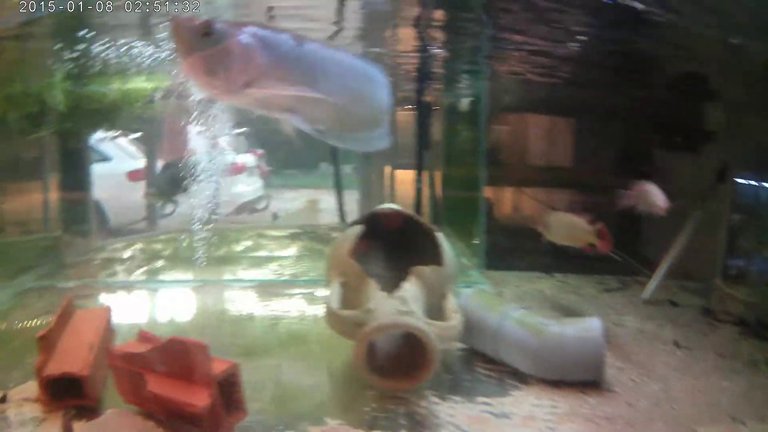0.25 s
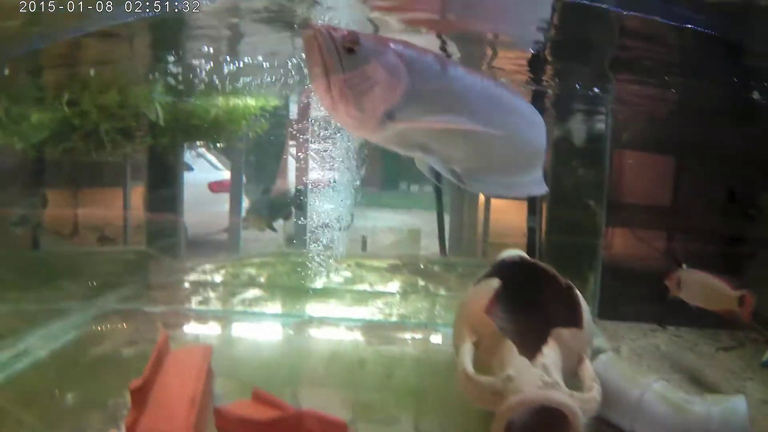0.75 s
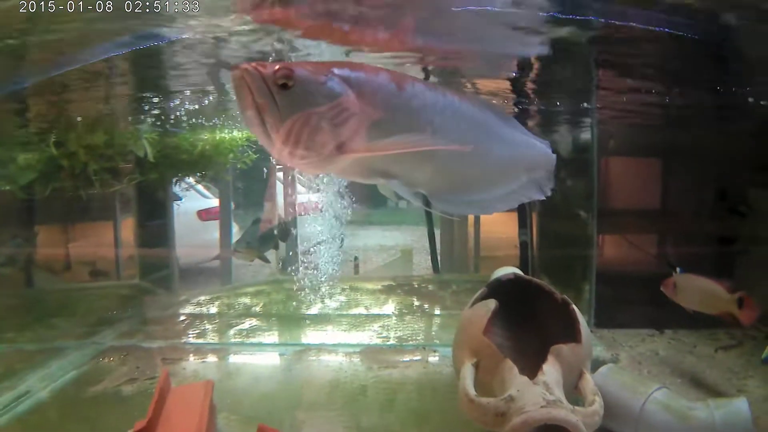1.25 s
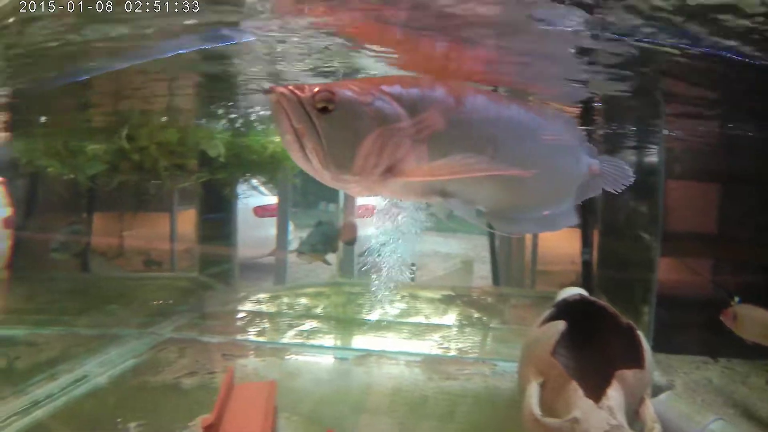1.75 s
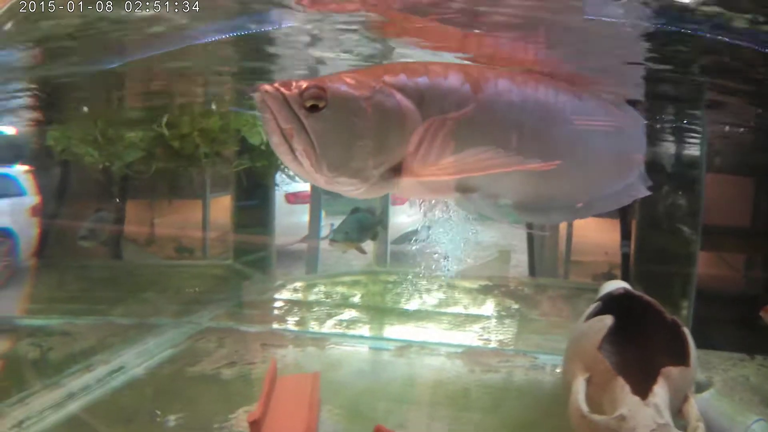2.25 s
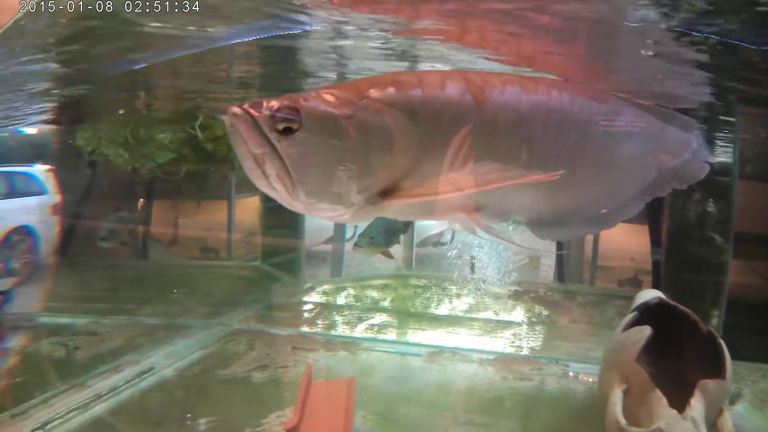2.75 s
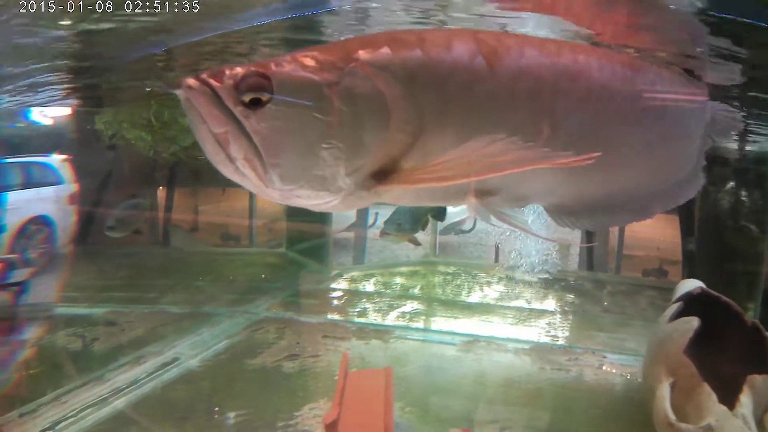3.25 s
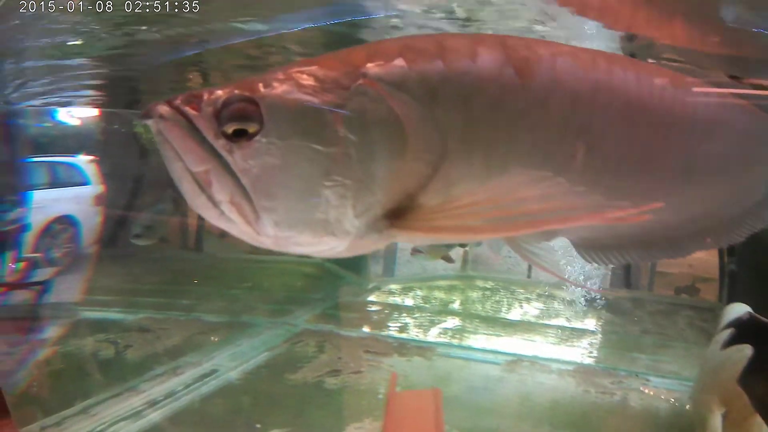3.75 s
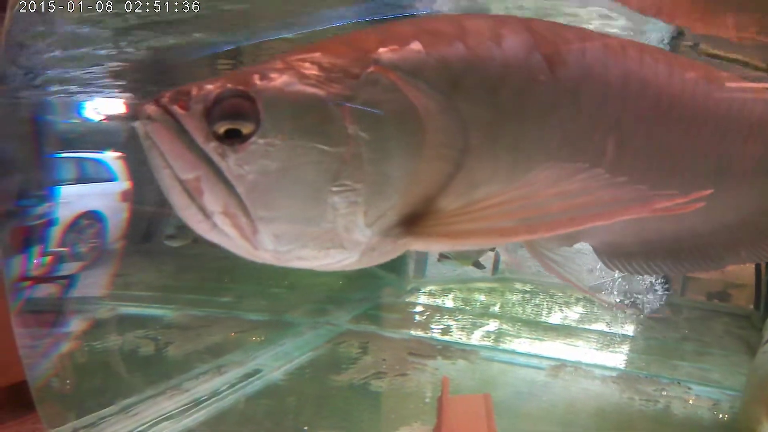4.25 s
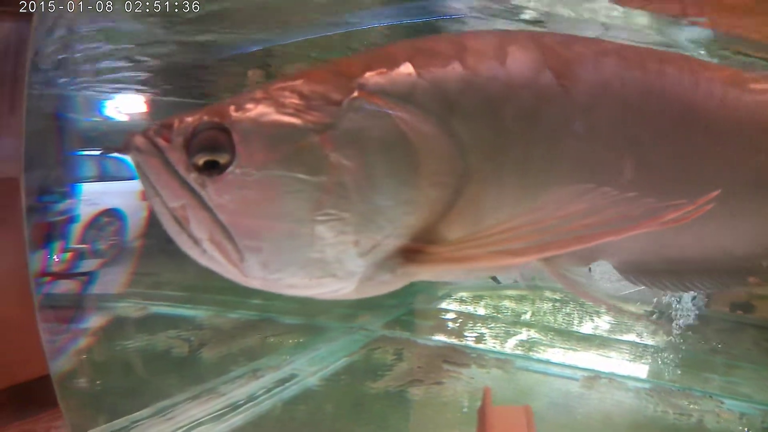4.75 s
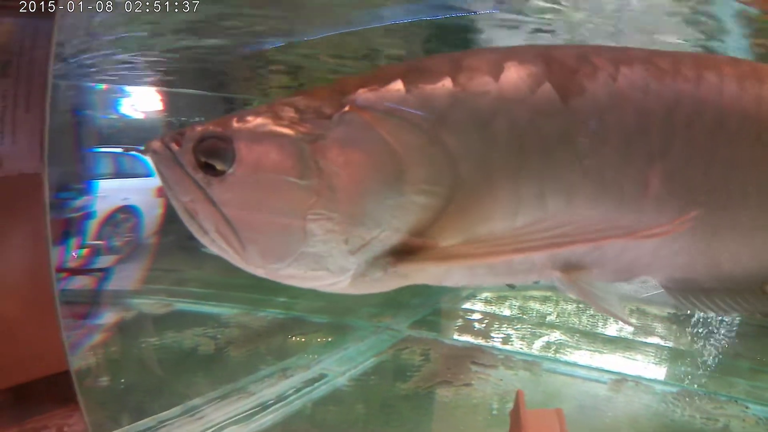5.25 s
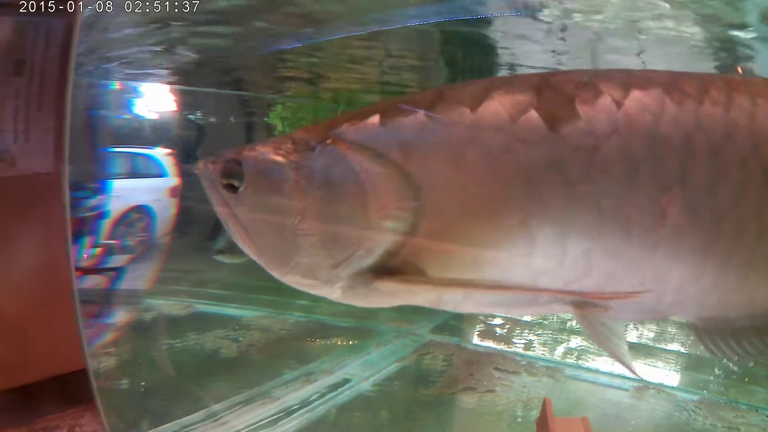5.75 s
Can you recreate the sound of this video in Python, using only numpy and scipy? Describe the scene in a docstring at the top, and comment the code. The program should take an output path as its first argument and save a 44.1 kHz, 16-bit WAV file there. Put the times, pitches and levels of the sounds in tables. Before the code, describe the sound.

Inside a fish tank, a microphone sealed in a plastic housing picks up soft nudges and dull finger rubbing. A hard blow against glass follows, then about a second of loud gritty scraping with deep judder and knocks, distorting. A final heavy knock frees it; the low rocking fades and a faint pane ring lingers over muffled air bubbles and barely audible pump hum.

```python
"""A waterproof camera is moved about inside a fish tank. Fingers creep on its housing, which is nudged a few
times, then bumps the glass, scrapes along it for a second and knocks free, overloading the microphone.
The pane rings on briefly and the rocking calms; an air stone's muffled fizz and a faint pump hum, there
throughout, are left, later with nearer bubbles. Blows and slips are noise bursts and grains through the
housing's modes; sway, pane, bubbles and pump are sines; swirl, judder and fizz are coloured noise."""
import sys
import numpy as np
from scipy import signal
from scipy.fft import rfft, irfft, next_fast_len
from scipy.io import wavfile
from scipy.ndimage import uniform_filter1d, map_coordinates

SR = 44100
rng = np.random.default_rng(int(sys.argv[2]) if len(sys.argv) > 2 else 0)


def bounce(signal):
    """Save signal as a 16-bit WAV file at the path given by the first command-line argument."""
    frames = np.transpose(np.atleast_2d(signal))
    limited = np.clip(frames, -1, 1)
    pcm = np.round(limited * 32767).astype(np.int16)
    wavfile.write(sys.argv[1], SR, pcm)


N = 265041
T = np.arange(N) / SR
START_S, STOP_S = 1.278, 2.381  # hard contact with the glass

# Steering the camera towards the glass. Each row: time in seconds, sway level in dB.
STEER = [(0.0, -40), (0.162, -26.5), (0.508, -43), (0.56, -31), (0.616, -38.5), (1.196, -32.5),
         (1.25, -28.5)]


def amp(db):
    """Decibels to gain."""
    return 10 ** (np.asarray(db) / 20)


def unit(x):
    """Scale to rms 1."""
    return x / np.sqrt(np.mean(x ** 2) + 1e-20)


def since(start_s):
    """Seconds elapsed after start_s, zero before."""
    return np.maximum(T - start_s, 0)


def curves(rows):
    """One value per sample for each column after the time."""
    times_s, *columns = np.transpose(rows)
    return [np.interp(T, times_s, column) for column in columns]


def wobble(knots_per_s):
    """A smooth random curve through normally distributed knots."""
    knots = rng.standard_normal(int(N * knots_per_s / SR) + 4)
    return map_coordinates(knots, [T * knots_per_s])


def filtered(x, response):
    """Multiply the spectrum of x by a response of frequency in Hz."""
    size = next_fast_len(N + SR // 2)
    spectrum = rfft(x, size) * response(np.fft.rfftfreq(size, 1 / SR))
    return irfft(spectrum, size)[:N]


def coloured(x, points):
    """Filter x by a (Hz, dB) curve on a log frequency axis."""
    points_hz, points_db = np.transpose(points)
    return filtered(x, lambda hz: amp(np.interp(np.log(hz + 1), np.log(points_hz), points_db)))


def noise(points):
    """Coloured noise of rms 1."""
    return unit(coloured(rng.standard_normal(N), points))


def grains(per_s, spread_db):
    """Random impulses of either sign and uneven size."""
    hits = rng.random(N) < per_s / SR
    signs = rng.choice([-1, 1], N)
    return hits * signs * amp(spread_db * rng.standard_normal(N))


def fade(start_s, t60_s):
    """An exponential decay from 1 at start_s, zero before."""
    return (T >= start_s) * amp(-60 * since(start_s) / t60_s)


def ring(start_s, db, hz, t60_s):
    """One damped mode struck at start_s."""
    return amp(db) * fade(start_s, t60_s) * np.sin(2 * np.pi * hz * (T - start_s))


def patchy(x, depth_db, width_hz, life_s):
    """Narrow bands of x swell and sink on their own, each for about life_s; rms 1."""
    hz, times_s, spectra = signal.stft(x, SR, nperseg=1024)
    where = np.meshgrid(hz / width_hz, times_s / life_s, indexing="ij")
    field = map_coordinates(rng.standard_normal((256, 256)), where, order=1, mode="wrap")
    _, uneven = signal.istft(spectra * amp(depth_db * field), SR, nperseg=1024)
    return unit(uneven[:N])


def sealed(x):
    """The waterproof seal lets no sharp edge through: a steep low-pass."""
    return signal.sosfilt(signal.butter(8, 3500, fs=SR, output="sos"), x)


def housing(force):
    """The plastic shell rings in short modes, muffled by water and seal; rms 1."""
    # Shell resonances. Each row: centre in Hz, width in Hz, level in dB.
    shell_modes = [(298, 130, -2), (400, 210, 3.5), (564, 140, -6), (814, 250, -1.5), (1125.5, 150, -6),
                   (1312, 210, -0.5), (1405, 120, 0), (1660, 180, -2.5), (1837, 170, -3), (1930, 480, -9.5),
                   (2178, 156, -10.5), (2700, 320, -20), (3200, 580, -18)]
    # What water and seal let through. Each row: frequency in Hz, gain in dB.
    muffle = [(1900, -1.5), (2200, -1), (2430, -1), (3300, -1), (3650, 0.5), (3950, -10.5), (4400, -35),
              (5000, -82.5)]

    def response(f_hz):
        power = sum((amp(db) / (1 + (2 * (f_hz - hz) / width_hz) ** 2)) ** 2
                    for hz, width_hz, db in shell_modes)
        return np.sqrt(power)

    return unit(coloured(filtered(force, response), muffle))


def scrape():
    """Dense tiny slips excite the housing while the body judders over the glass; pressure brightens them."""
    # Pressing along the glass. Each row: time in seconds, level of the gritty bite in dB.
    press = [(1.28, -12.5), (1.422, -18.5), (1.428, -25.5), (1.504, -15.5), (1.704, -16), (1.768, -21.5),
             (1.804, -14.5), (2.02, -18.5), (2.354, -16), (2.37, -13)]
    # Body judder spectrum. Each row: frequency in Hz, gain in dB.
    judder_colour = [(20, -10), (45, -2), (68, 3), (100, -7.5), (125, -5), (190, -10.5), (300, -20.5),
                     (800, -77)]
    drag_mean_db, drag_db_per_press_db = -19, .35  # dull drag at mean pressure
    judder_re_drag_db = -2.3
    dig_db, dig_ease_s = 5, .12  # the rim digs in on arrival: extra drag
    skip_s, skip_half_length_s, skip_db = 1, .006, -14  # a brief dip in level, set before contact begins, so it is never heard

    press_db, = curves(press)
    dip_db = skip_db * np.exp(-((T - skip_s) / skip_half_length_s) ** 2)
    bite_db = press_db + dip_db
    mean_press_db = np.mean(press, axis=0)[1]
    drag_db = drag_mean_db + drag_db_per_press_db * (press_db - mean_press_db)
    drag_db = drag_db + dig_db * np.exp(-since(START_S) / dig_ease_s) + dip_db

    slips = housing(grains(per_s=15000, spread_db=0.5))
    # the moving contact favours changing modes
    slips = patchy(slips, depth_db=1.3, width_hz=130, life_s=.04)
    drag = filtered(slips, lambda hz: 1 / (1 + (hz / 1030) ** 12))
    bite = slips - drag

    grip_db = .9 * wobble(130)  # the rim catches and lets go
    drag = amp(drag_db) * unit(drag * amp(grip_db + 1.3 * wobble(60)))
    bite = amp(bite_db) * unit(bite * amp(grip_db))
    judder = amp(drag_db + judder_re_drag_db) * unit(noise(judder_colour) * amp(1.9 * wobble(35)))
    contact = (T >= START_S) * np.where(T < STOP_S, 1, fade(STOP_S, t60_s=0.038))
    return contact * (drag + bite + judder)


def knocks():
    """Each blow is a short rattle of the shell over a soft thud, its pitch smeared by the shifting grip."""
    # Blows on the housing. Each row: start in seconds, click level in dB, thud level in dB before
    # thud_trim_db, thud pitch in Hz, click t60 in seconds.
    blows = [(0.0595, -28.5, -29, 348, 0.017), (0.209, -41, -52, 303, 0.027), (0.218, -38, -27, 214, 0.032),
             (0.554, -40, -34, 318, .028), (0.576, -39.5, -32, 340, .035), (0.607, -50, -29, 114, 0.025),
             (0.949, -52, -26.5, 123.7, 0.027), (1.079, -39, -62, 506, 0.048),
             (1.2775, 0.5, -6, 394, 0.033), (1.295, -8, -7.5, 109, 0.052), (1.308, -8.5, -5, 128, .04),
             (1.335, -9.5, -15, 411, .06), (1.437, -24.5, -5, 244.5, .025), (1.875, -8, -20.5, 400, 0.039),
             (2.128, -9, -12, 72, 0.042), (2.212, -30, -8.5, 129.5, 0.021),
             (2.3734, -2.5, -2.5, 778, 0.018), (2.3762, -25, 1.5, 325, 0.031)]
    thud_trim_db = 1.0
    click_rise_t60_s = 0.00074
    thud_t60_s, thud_s_per_click_s = .02, .8  # a thud rings this long plus a share of its click's t60
    graze_s, graze_db = .013, -28.5  # the rim brushes the glass just before it hits

    graze = amp(graze_db) * (T > START_S - graze_s) * (T < START_S)
    contact = noise([(100, 5.5), (1000, 2), (3200, -8), (4000, -21.5), (5000, -80)])  # (Hz, dB)
    rattle = unit(housing(rng.standard_normal(N)) + amp(-3.5) * contact)
    smear_rad = .5 * wobble(350)

    force = np.zeros(N)
    thuds = np.zeros(N)
    for start_s, click_db, thud_db, thud_hz, click_t60_s in blows:
        force += amp(click_db) * fade(start_s, click_t60_s) * (1 - fade(start_s, click_rise_t60_s))
        swell = 1 - fade(start_s, 2 / thud_hz)  # water cushions the blow: low thuds start more softly
        decay = fade(start_s, thud_t60_s + thud_s_per_click_s * click_t60_s)
        tone = np.sin(2 * np.pi * thud_hz * (T - start_s) + smear_rad)
        thuds += amp(thud_db + thud_trim_db) * swell * decay * tone
    return sealed((force + graze) * rattle + thuds)


def swing(start_s, db, hz, rise_s):
    """A shove swells over rise_s and is soon damped by the water."""
    u = since(start_s) / rise_s
    return amp(db) * (u * np.exp(1 - u)) ** 2 * np.sin(2 * np.pi * hz * (T - start_s))


def rocking():
    """The camera sways at an unsteady, very low pitch, most on the glass, then calms; water swirls with it."""
    # Shoves that swing the camera. Each row: start in seconds, envelope peak in dB, pitch in Hz, rise in seconds.
    shoves = [(1.273, -1, 42.7, .014), (2.3866, 1.5, 22.96, 0.027)]
    # Swirl spectrum. Each row: frequency in Hz, gain in dB.
    swirl_colour = [(20, -5), (45, 1), (70, -3.5), (100, -12), (135, -11.5), (200, -15.5), (400, -28.5),
                    (800, -32.5), (2000, -67)]
    dragged_db, rest_db = -16.3, -48  # on the glass, and held still
    settle_db, settle_s = 19.5, .35  # extra sway once free, and its time to calm
    unsteady_free_db, unsteady_dragged_db = 2, 1.4  # the glass steadies the sway
    swirl_at_0_db_sway_db, swirl_db_per_sway_db = -22.5, .72
    wash_db, wash_t60_s = -33, .35  # water rushes back in behind the released camera

    steer_db, = curves(STEER)
    free_db = rest_db + settle_db * np.exp(-since(STOP_S) / settle_s)
    stage_db = np.select([T < START_S, T < STOP_S], [steer_db, dragged_db], free_db)
    on_glass = (T > START_S) & (T < STOP_S)
    unsteady_db = np.where(on_glass, unsteady_dragged_db, unsteady_free_db) * wobble(12)
    sway_db = uniform_filter1d(stage_db, size=SR // 12) + unsteady_db

    sway_hz = 23.81 * np.exp(.25 * wobble(30))
    sway_tone = np.sqrt(2) * np.sin(2 * np.pi * np.cumsum(sway_hz) / SR)
    sway = amp(sway_db + .8 * wobble(43)) * sway_tone
    swirl_gain = amp(swirl_at_0_db_sway_db + swirl_db_per_sway_db * sway_db)
    wash_gain = amp(wash_db) * fade(STOP_S, wash_t60_s)
    swirl = (swirl_gain + wash_gain) * noise(swirl_colour)
    return sway + swirl + sum(swing(*shove) for shove in shoves)


def pane():
    """The glass wall rings on in damped modes when the camera leaves it."""
    # Modes of the released glass. Each row: frequency in Hz, level in dB, t60 in seconds.
    pane_modes = [(166, -37.5, 0.9), (295, -45, .4), (1788, -64.5, 2.4), (1828, -60, 2.2)]
    return sum(ring(STOP_S, db, hz, t60_s) for hz, db, t60_s in pane_modes)


def fingers():
    """While the camera is steered, the grip creeps over the shell in dull little slips."""
    rub_mean_db, rub_db_per_sway_db = -60.5, 0.43
    steer_db, = curves(STEER)
    rub_db = rub_mean_db + rub_db_per_sway_db * (steer_db - np.mean(STEER, axis=0)[1])
    slips = housing(grains(per_s=900, spread_db=3))
    slips = coloured(slips, [(350, -2.5), (900, -8), (2500, -11)])  # (Hz, dB)
    return (T < START_S) * amp(rub_db) * unit(slips)


def bubbles():
    """Nearer bubbles ping now and then, once the camera has drifted towards the air stone."""
    # Pitches where the housing resonates, in Hz, before detuning.
    centres_hz = [1360, 1850]
    from_s, per_s = 3.85, 5.6
    mean_db, spread_db, t60_s = -52, -3.5, 0.13
    span_s = T[-1] - from_s
    pings = np.zeros(N)
    for when, size, mode, detune in rng.random((int(per_s * span_s), 4)):
        start_s = from_s + when * span_s
        hz = centres_hz[int(mode * len(centres_hz))] * (1 + 0.055 * (2 * detune - 1))
        db = mean_db + spread_db * (2 * size - 1)
        onset = 1 - fade(start_s, t60_s=0.0072)
        pings += ring(start_s, db, hz, t60_s) * onset
    return sealed(pings)


def tank():
    """The air stone's fizz gurgles where the housing resonates, with a few nearer bubbles and the pump's hum."""
    # Air stone level. Each row: time in seconds, level in dB.
    fizz_level = [(0, -58.5), (1.2, -61), (2.5, -57.5), (3.45, -62), (4.0, -60), (4.5, -62.5), (5.2, -59.5),
                  (6.0, -62)]
    # Fizz spectrum. Each row: frequency in Hz, gain in dB.
    fizz_colour = [(100, -18.5), (300, -2.5), (600, -2.5), (1050, -7.5), (1240, -3), (1370, 1.5),
                   (1560, -3.5), (1880, 1), (2250, -4.5), (2500, -9), (3300, -10.5), (3750, -17),
                   (4400, -47.5), (5000, -100)]
    # Air pump. Each row: frequency in Hz, level in dB about which it wavers.
    pump_tones = [(100, -72), (500.6, -79)]

    fizz_db, = curves(fizz_level)
    stream = noise(fizz_colour)
    resonant = filtered(stream, lambda hz: (hz > 1200) & (hz < 2400))
    gurgle = np.std(resonant) * patchy(resonant, depth_db=4.0, width_hz=80, life_s=.03)
    fizz = amp(fizz_db) * (stream - resonant + gurgle)

    hum = np.zeros(N)
    for hz, db in pump_tones:
        hum += amp(db + 1.5 * wobble(1.7)) * np.sqrt(2) * np.sin(2 * np.pi * hz * T)
    return fizz + bubbles() + hum


def scene():
    """Everything reaches the one microphone through the housing."""
    on_glass = sealed(scrape() + rocking() + pane())
    return (on_glass + knocks() + fingers() + tank())[None]


def record(dry):
    """The microphone overloads, flattening the loudest peaks; the recorder adds faint hiss and limits the band."""
    ceiling, knee = .72, 24  # full scale = 1; a higher knee clips harder
    clipped = dry[0] / (1 + np.abs(dry[0] / ceiling) ** knee) ** (1 / knee)
    hiss = amp(-103) * rng.standard_normal(N)
    return filtered(clipped + hiss, lambda hz: hz < 15900)[None]


dry = scene()
out = record(dry)
bounce(out)
```